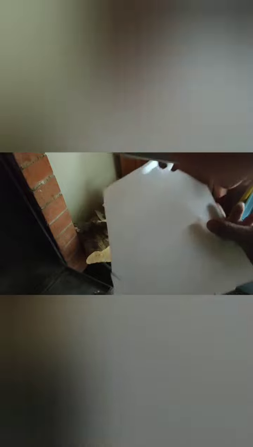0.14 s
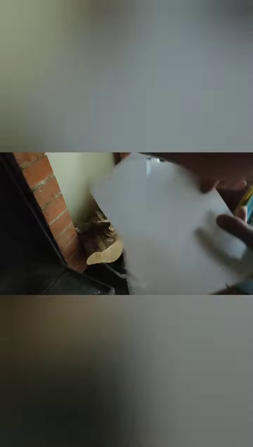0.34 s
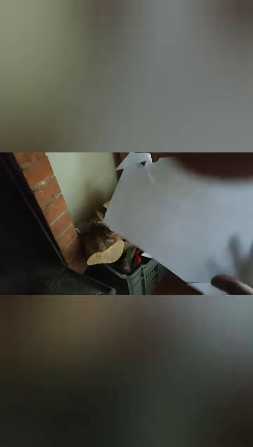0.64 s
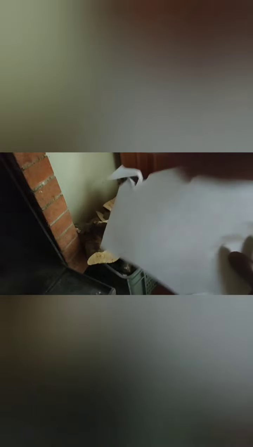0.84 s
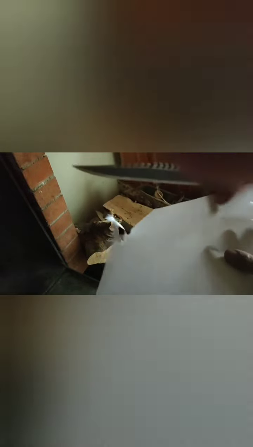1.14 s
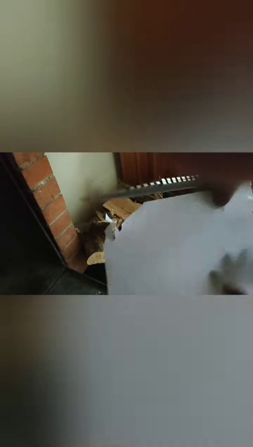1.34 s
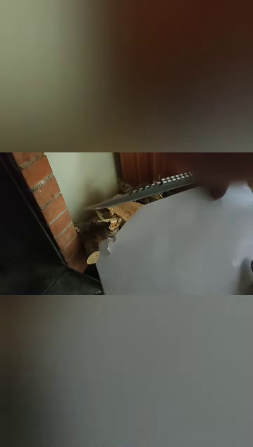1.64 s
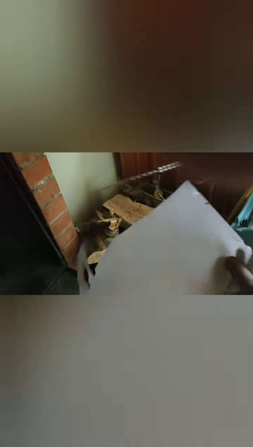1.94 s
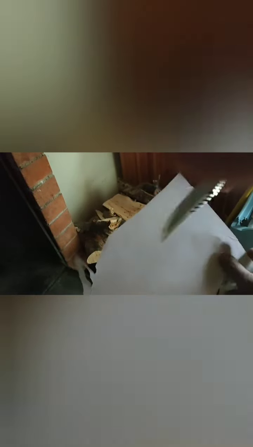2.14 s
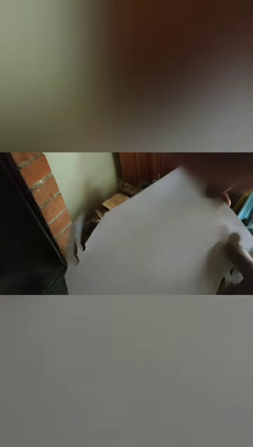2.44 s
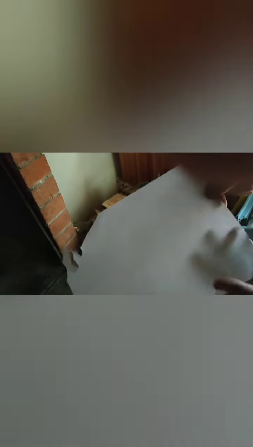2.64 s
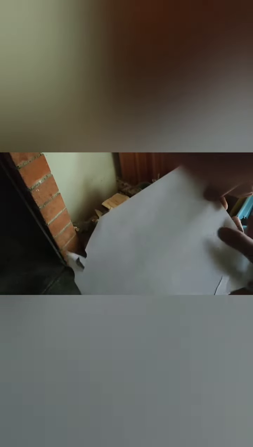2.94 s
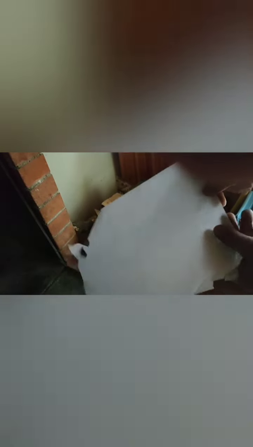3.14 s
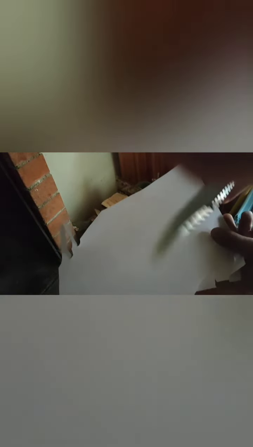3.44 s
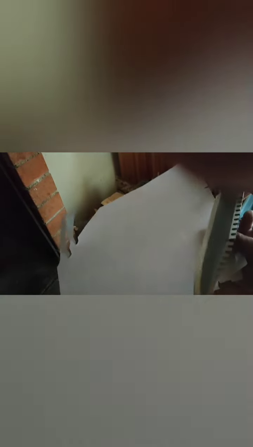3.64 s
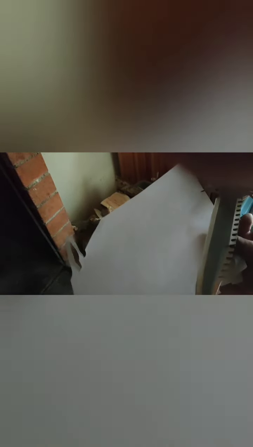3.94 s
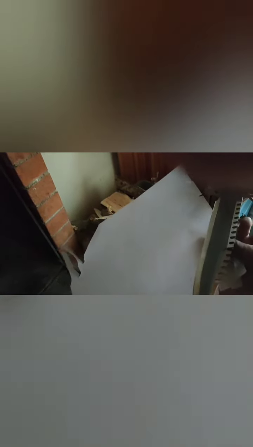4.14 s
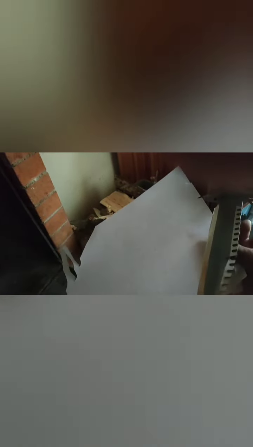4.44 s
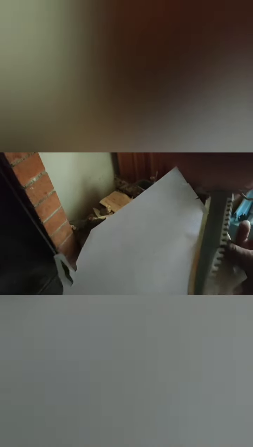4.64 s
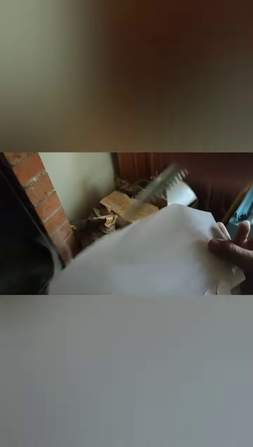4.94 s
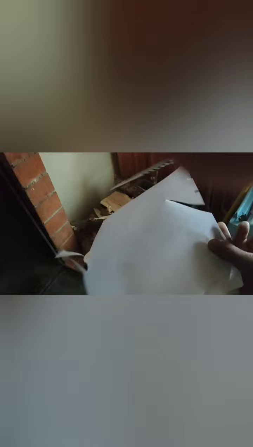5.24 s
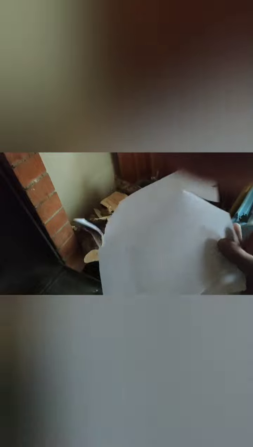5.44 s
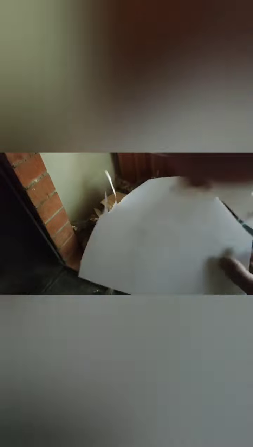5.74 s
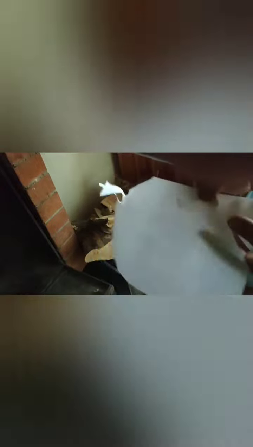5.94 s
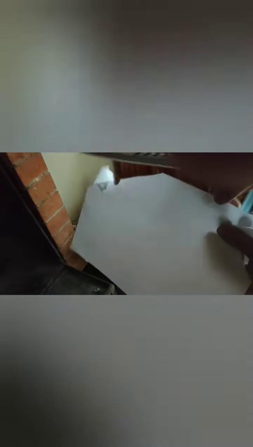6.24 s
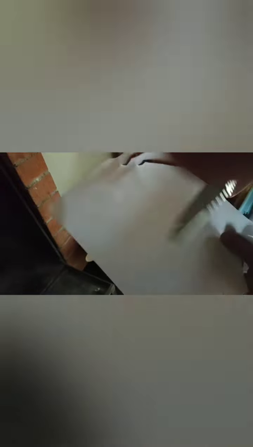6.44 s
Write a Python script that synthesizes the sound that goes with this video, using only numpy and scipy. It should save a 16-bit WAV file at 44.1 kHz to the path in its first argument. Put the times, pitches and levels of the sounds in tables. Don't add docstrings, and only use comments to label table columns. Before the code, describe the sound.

Close stereo sound of stiff paper handled in a small, dry room. Irregular bursts of rustle, flutter and crease clicks fade to almost nothing; a brief bright ripping cut breaks the quiet, followed by faint rubbing. Finally the paper buckles with the loudest hard snaps and crackly crumpling. A very short reflection and low faint background hush sit around it.

```python
import sys
import numpy as np
from scipy import signal
from scipy.fft import rfft, irfft
from scipy.io import wavfile

SR = 44100
rng = np.random.default_rng(int(sys.argv[2]) if len(sys.argv) > 2 else 0)


def to_wav(sig):
    pcm = np.clip(np.atleast_2d(sig), -1, 1) * 32767
    pcm = np.round(pcm).astype(np.int16)
    wavfile.write(sys.argv[1], SR, pcm.T)


def natural_amplitude(level_db):
    exponent = np.asarray(level_db, float) / 20
    return 10 ** exponent


N = 290178
LEFT_LAG_SAMPLES = 7


def rms_one(x):
    return x / np.sqrt(np.mean(x ** 2) + 1e-20)


def at_hz(points, hz):
    table_hz, values = np.array(points).T
    return np.interp(np.log(hz), np.log(np.maximum(table_hz, 1)), values)


def coloured(x, spectrum):
    hz = np.maximum(np.arange(N // 2 + 1) * SR / N, 1)
    return irfft(rfft(x) * natural_amplitude(at_hz(spectrum, hz)), N)


def band(x, low_hz, high_hz):
    edges_hz = [low_hz, min(high_hz, SR / 2 - 2000)]
    return signal.sosfilt(signal.butter(2, edges_hz, "band", fs=SR, output="sos"), x)


def drift(rate_hz):
    r = np.exp(-40 * np.pi * rate_hz / SR)
    white = rng.standard_normal(N // 20 + 2002)
    slow = signal.lfilter([1], [1, -2 * r, r * r], white)[2000:]
    return np.interp(np.arange(N) / 20, np.arange(len(slow)), rms_one(slow - slow.mean()))


# f/Hz, share [0..1]
LIKENESS = [(40, 0.73), (120, 1), (250, 0.99), (700, 0.97), (1500, 0.97), (3000, 0.14), (8000, 0.08),
            (15000, 0.2)]
# f/Hz, level/dB
LEFT_OVER_RIGHT = [(60, -4.5), (150, 0.5), (380, -3.5), (950, 3), (2380, 6.5), (5980, -2), (15000, 6)]


def ports(common, own, hz):
    alike = np.clip(at_hz(LIKENESS, hz), 0, 1)
    pair = np.array([np.roll(common, LEFT_LAG_SAMPLES), common])
    pair = np.sqrt(alike) * pair + np.sqrt(1 - alike) * own
    return pair * natural_amplitude(at_hz(LEFT_OVER_RIGHT, hz) / 2 * np.array([[1], [-1]]))


# f/Hz, level/dB per Hz
FLOOR = [(24, -48), (40, 4), (211, 14), (643, -10.5), (746, -12), (6300, -16), (15000, -17)]


def room_tone():
    return natural_amplitude(-82.5) * rms_one(coloured(rng.standard_normal((2, N)), FLOOR))


def move(s, db, rise_db_per_s, fall_db_per_s):
    t = np.arange(0, N / SR, .001)
    rise_db = rise_db_per_s * np.maximum(s[0] - t, 0)
    fall_db = fall_db_per_s * np.maximum(t - s[-1], 0)
    return np.interp(t, s, db) - rise_db - fall_db


# start t/s, end t/s, start force level/dB, end force
# level/dB, brightness/dB (sliding +, bending -)
HANDLING = [(0.0, 0.032, -58, -60, 7), (0.028, 0.099, -59, -61, -24), (0.298, 0.376, -62, -52.5, 7.5),
            (0.385, 0.559, -49.5, -58, 1.5), (0.68, 0.73, -84, -76, 1), (0.747, 0.882, -60, -55, -2),
            (0.872, 0.945, -42, -53.5, -6), (0.95, 1.051, -57.5, -50, -6.5),
            (1.203, 1.272, -54.5, -51, -9.5), (1.297, 1.474, -60.5, -56, 9),
            (1.484, 1.638, -55.5, -70.5, -0.5), (1.644, 1.753, -59, -56, -1.5),
            (1.73, 1.82, -49, -41.5, -4.5), (1.817, 2.01, -47.5, -54.5, 1), (2.067, 2.16, -54.5, -64.5, 2),
            (2.156, 2.29, -71, -67, 13.5), (2.36, 2.488, -85, -87, 10), (2.487, 2.582, -69, -51.5, 2.5),
            (2.6, 2.77, -58, -58.5, -2.5), (2.84, 2.988, -83, -71.5, 5), (2.992, 3.117, -57.5, -64.5, -0.5),
            (3.128, 3.17, -53.5, -54.5, -6.5), (3.208, 3.331, -49.5, -60.5, -3.5),
            (3.365, 3.424, -60, -65, 6.5),
            (3.65, 3.684, -70, -71, 3), (3.797, 3.91, -71, -76.5, 3.5), (3.963, 4.096, -79, -74.5, 3),
             (4.088, 4.3, -66.5, -90, -1), (4.31, 4.41, -85.5, -71.5, 6), (4.42, 4.55, -73.5, -79, 6),
             (5.077, 5.151, -73, -62.5, 16), (5.262, 5.303, -64, -62, 0), (5.373, 5.522, -73, -76.5, 9),
             (5.519, 5.74, -67.5, -76.5, 10.5), (5.72, 5.806, -69, -57.5, 10.5),
             (5.873, 6.003, -71, -62.5, 12.5), (6.02, 6.193, -59.5, -54, 0.5), (6.2, 6.293, -58, -43.5, 6),
             (6.29, 6.39, -36.5, -44, -8), (6.406, 6.492, -44.5, -35.5, -3), (6.503, 6.6, -40, -56, -7)]
CREEPING = [
    (0.13, 0.128, -55, -71, -21),
    (1.142, 1.187, -72.5, -72.5, 7),
    (3.47, 3.64, -91, -88.5, 4),
    (3.73, 3.787, -87, -71, -1),
    (4.232, 4.266, -80, -75, -1),
    (5.22, 5.255, -79, -68, -14),
]
# t/s, force level/dB, brightness/dB
CUT = [
    (4.613, -61, 4.5),
    (4.63, -59.5, -3.5),
    (4.8, -43.5, 7.5),
    (4.93, -30, -3),
    (4.986, -33, -3),
    (5.09, -56, 0),
]
# t/s, level/dB
FLAPS = [
    (0.08, -54),
    (0.887, -43.5),
    (1.795, -39.5),
    (2.77, -58.5),
    (4.64, -59.5),
    (4.986, -36.5),
    (5.2, -61),
    (6.27, -44.5),
    (6.42, -39.5),
]
# hand level/dB, blade level/dB, brightness share [1], rise [dB/s], fall [dB/s]
LAYERS = [
    (-3, -13.5, 0.037, 696, 163),
    (-0.33, -0.75, -0.019, 1501.5, 243),
    (-1, 3, 0.43, 1495, 273.5),
    (-7, -4.5, 0.79, 1499.5, 266),
    (-18, -15, 1.03, 1503, 281),
]


def layer_levels():
    cut_s, force_db, bright_db = np.transpose(CUT)
    levels = []
    for hand_db, blade_db, share, rise, fall in LAYERS:
        db = move(cut_s, force_db + blade_db + share * bright_db, rise, fall)
        for start, end, first_db, last_db, bright in HANDLING + CREEPING:
            hand = move([start, end], [first_db, last_db], rise, fall)
            db = np.maximum(db, hand + hand_db + share * bright)
        levels.append(db)
    for s, flap_db in FLAPS:
        levels[0] = np.maximum(levels[0], move([s], [flap_db], rise_db_per_s=289, fall_db_per_s=199))
    ms = np.arange(N) / SR * 1000
    return [np.interp(ms, np.arange(len(db)), db) for db in levels]


def fibres(per_s, size_spread_db):
    breaks = rng.random((3, N)) < per_s / SR
    sizes = natural_amplitude(size_spread_db * np.minimum(rng.exponential(1, (3, N)), 4))
    return breaks * sizes * rng.choice([-1, 1], (3, N)) + 1e-18


# f/Hz, level/dB per Hz
SHEET = [(40, -31), (90, -13.5), (160, -6), (280, -6), (340, -2.5), (450, -8), (1000, -1), (2800, -7),
         (5000, -9), (7200, -13), (8000, -25), (9500, -19), (14500, -31.5), (15600, -24.5)]
LAYER_EDGES_HZ = [40, 500, 1800, 4200, 7700, 15500]


def rasp():
    grains = coloured(fibres(per_s=4000, size_spread_db=1.5), SHEET)
    clumps_db = 0.64 * drift(30) + 0.81 * drift(150)
    out, sign = np.zeros((2, N)), 1
    for low_hz, high_hz, db in zip(LAYER_EDGES_HZ, LAYER_EDGES_HZ[1:], layer_levels()):
        edges_hz = np.geomspace(low_hz, high_hz, 2 + int(1.7 * np.log2(high_hz / low_hz)))
        layer = 0
        for a, b in zip(edges_hz, edges_hz[1:]):
            sign = -sign
            common, *own = band(grains, a, b)
            patch_db = 1.9 * drift(12.5)
            layer = layer + sign * natural_amplitude(patch_db) * ports(common, np.array(own), np.sqrt(a * b))
        layer = layer / np.std(layer.mean(axis=0))
        out += layer * natural_amplitude(db + clumps_db - 0.66)
    return out


def crackle():
    clicks, out = fibres(per_s=200, size_spread_db=4.5)[0], 0
    pitches_hz = np.geomspace(700, 4500, 10)
    dealt = rng.integers(0, len(pitches_hz), N)
    for k, hz in enumerate(pitches_hz):
        r, w = natural_amplitude(-60 * hz / 9 / SR), 2 * np.pi * hz / SR
        struck = clicks * (dealt == k) + 1e-18
        ring = signal.lfilter([0, np.sin(w)], [1, -2 * r * np.cos(w), r * r], struck)
        out = out + ports(ring, 0, hz)
    return rms_one(band(out, 480, 7000)) * natural_amplitude(layer_levels()[1] - 5)


def room(x):
    t60_s, tail_db, echo_s, echo_db = 0.077, -15, .0055, -19.5
    t = np.arange(SR // 2) / SR
    tail = band(rng.standard_normal((2, len(t))), 750, 6600) * natural_amplitude(-60 * t / t60_s) * (t > .002)
    tail = natural_amplitude(tail_db) * tail / np.sqrt(np.sum(tail ** 2, axis=1, keepdims=True))
    tail[:, round(echo_s * SR)] += natural_amplitude(echo_db)
    return signal.fftconvolve(x, tail, axes=1)[:, :N]


def port_cut(x):
    return signal.sosfilt(signal.butter(3, 9700, fs=SR, output="sos"), x)


# t/s, pulse peak level/dB, f/Hz
BUCKLES = [(0.0572, -33, 2410), (0.0794, -31.5, 1120), (0.325, -24, 2030), (0.33, -27.5, 1870),
           (0.5414, -37, 2270), (0.7256, -39.5, 2300), (0.766, -43, 1320), (0.8781, -20.5, 1770),
           (0.889, -30, 1130), (1.042, -32, 2600), (1.0856, -31.5, 1660), (1.2086, -32, 1990),
           (1.2265, -33.5, 2350), (1.4027, -31, 1610), (1.4069, -31.5, 1350), (1.4557, -31, 3040),
           (1.4837, -28.5, 2300), (1.5302, -35, 2450), (1.704, -30.5, 2950), (1.7354, -30.5, 1740),
           (1.768, -22.5, 2600), (1.8017, -13.5, 1960), (1.81, -36, 2680), (1.897, -25.5, 1340),
           (1.9495, -28.5, 2170), (2.026, -30, 3020), (2.0321, -29.5, 1650),
           (2.319, -41, 2640), (2.4901, -45, 2000), (2.5276, -29, 2100), (2.5611, -36, 1620),
              (2.5872, -27.5, 1610), (2.6178, -32.5, 2020), (2.7255, -32, 1430), (2.7681, -35.5, 2000),
              (2.9786, -45, 1930), (2.9953, -42, 1990), (3.0735, -37.5, 2340), (3.136, -32, 3220),
              (3.1435, -32, 2750), (3.1539, -26.5, 1650), (3.2155, -30, 2140), (3.3704, -35.5, 2530),
              (3.3752, -33, 4800), (3.4138, -45, 2020), (3.423, -41, 2650), (3.4554, -50, 2820),
              (3.6508, -39.5, 2920), (3.8496, -47, 2900), (3.978, -49.5, 1620), (4.5174, -53.5, 3590),
              (5.2453, -59, 1550), (5.3845, -40, 2000),
           (4.8505, -12, 2220), (4.879, -8, 2740), (4.9023, -11, 2580), (4.96, -22, 3200),
              (4.9823, -16, 2050), (4.9881, -18, 2460), (5.265, -33, 1480), (5.2708, -37, 1320),
              (5.3093, -51, 2650), (5.3789, -38.5, 2140), (5.529, -34, 2550), (5.738, -38, 2420),
              (5.8129, -31, 2870), (6.108, -35, 1300), (6.114, -30, 1300), (6.1509, -27, 1270),
              (6.1848, -27, 1790), (6.2163, -28, 1670), (6.2363, -22, 1600), (6.2793, -6.5, 2180),
              (6.2879, -4.5, 2046), (6.2953, -24, 2360), (6.3398, -14.5, 1480), (6.4208, -23, 1800),
              (6.4872, -8.5, 1600), (6.4955, -6, 2600), (6.5019, -30, 1810)]
CRACKS = [(0.289, -47, 1500), (0.474, -18.5, 2370), (1.7859, -11.5, 2460), (2.0732, -16.5, 1890),
          (2.5835, -18, 2920), (3.2105, -18, 1500), (4.0888, -34, 1410), (4.599, -41.5, 1300),
          (5.375, -33.5, 4700), (6.29, 2.5, 2620), (6.4101, -3.5, 2360), (6.4149, -3, 2270)]
CRUMPLES = [(0.297, -38, 2580), (0.37, -31, 1530), (0.388, -33.5, 2170), (0.86, -40, 1260),
            (0.988, -33.5, 1330), (1.0, -32, 1400), (1.04, -34, 1150), (1.652, -39, 990),
            (2.669, -36.5, 975), (3.093, -40.5, 880), (3.12, -48, 1010), (3.29, -37, 1160),
            (3.784, -49, 1360), (3.884, -50.5, 2150), (6.046, -38, 3700), (6.069, -43, 1200),
            (6.134, -41, 996), (6.17, -34, 1240), (6.316, -19.5, 1510), (6.328, -23, 1310),
            (6.354, -23, 1090), (6.474, -20, 1630)]


def snaps():
    shadow_s, shadow_db = 0.00046, -9.5
    # T60/s, crumple/dB, rise/s, pulse/dB
    sharp = [(s, db, hz, 0.035, -16 - 0.08 * db, 1e-4, 0) for s, db, hz in BUCKLES]
    soft = [(s, db, hz, 0.049, 0.5, 0.011, -6) for s, db, hz in CRUMPLES]
    clean = [(s, db, hz, 0.022, -16.5, 1e-4, 0) for s, db, hz in CRACKS]
    out, t = np.zeros((2, N + SR)), np.arange(SR // 10) / SR
    for s, peak_db, hz, t60_s, crumple_db, rise_s, pulse_db in sharp + soft + clean:
        crumple = rms_one(band(rng.standard_normal((3, len(t))), hz / 2.76, hz * 1.45))
        decay_db = -60 * t / np.clip(t60_s, .005, .08)
        crumple = crumple * natural_amplitude(crumple_db + 2.5 + decay_db) * (1 - np.exp(-t / rise_s))
        phase = 2 * np.pi * (t * hz - .5)
        pulse = natural_amplitude(pulse_db) * np.sqrt(np.e) * phase * np.exp(-phase ** 2 / 2)
        heard = ports(crumple[0], crumple[1:], hz) + ports(pulse, 0, hz)
        heard[1] += natural_amplitude(shadow_db) * np.roll(pulse, round(shadow_s * SR))
        start = round((s - .5 / hz) * SR) - LEFT_LAG_SAMPLES - 2
        out[:, start:start + len(t)] += natural_amplitude(peak_db + 0.5) * heard
    return out[:, :N]


# middle t/s, length t/s, level/dB, f/Hz
BRUSHES = [
    (1.23, 0.065, -49, 2300),
    (1.424, 0.28, -58, 5200),
    (2.258, 0.13, -83, 5300),
    (3.382, 0.056, -65, 11500),
    (4.082, 0.37, -70.5, 5200),
    (4.434, .2, -66, 5200),
    (4.806, 0.23, -42, 3860),
    (5.093, 0.17, -63, 11400),
    (6.003, .25, -76, 12100),
    (6.342, 0.078, -38, 1480),
]


def brushing():
    out, white = np.zeros((2, N)), rng.standard_normal((3, N))
    flicker = natural_amplitude(1.3 * drift(25))
    for s, length_s, db, hz in BRUSHES:
        span = slice(max(0, int((s - length_s) * SR)), min(N, int((s + length_s) * SR)))
        low_hz, high_hz = hz / 1.21, hz * 1.21
        common, *own = band(band(white[:, span], low_hz, high_hz), low_hz, high_hz)
        swell = natural_amplitude(db) * np.exp(-8 * ((np.arange(N)[span] / SR - s) / length_s) ** 2)
        out[:, span] += swell * rms_one(ports(common, np.array(own), hz))
    return out * flicker


def scene():
    paper = rasp() + port_cut(snaps()) + brushing() + crackle()
    return paper + room(paper) + room_tone()


def top_cut(x):
    return signal.sosfilt(signal.butter(12, 15920, fs=SR, output="sos"), x)


def record(dry):
    ceiling = .74
    rounded = ceiling * np.tanh(dry / ceiling)
    mix = signal.sosfilt(signal.cheby2(10, 60, 16500, fs=SR, output="sos"), rounded)
    return top_cut(mix)


dry = scene()
out = record(dry)
to_wav(out)
```